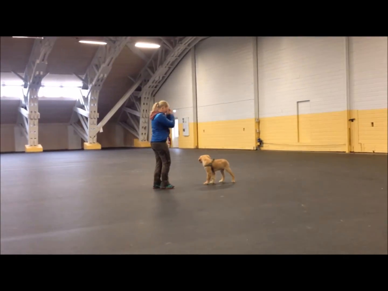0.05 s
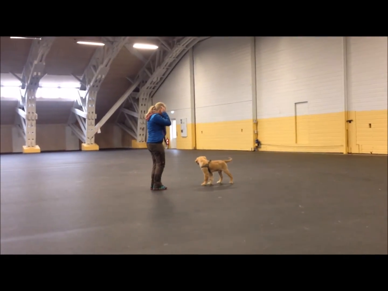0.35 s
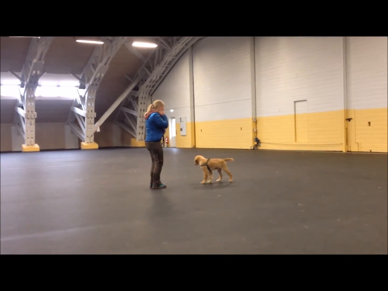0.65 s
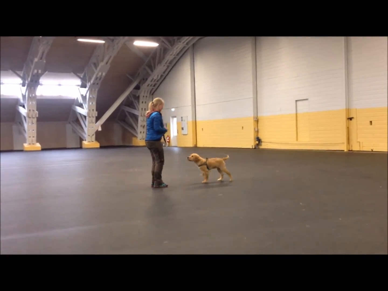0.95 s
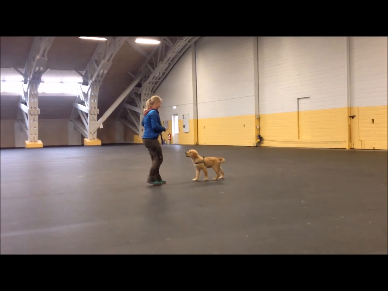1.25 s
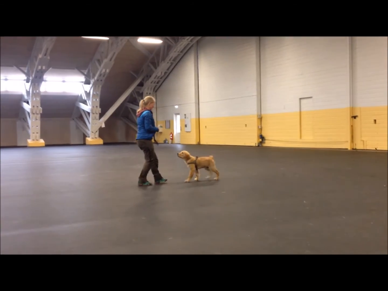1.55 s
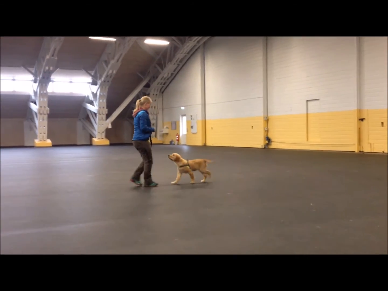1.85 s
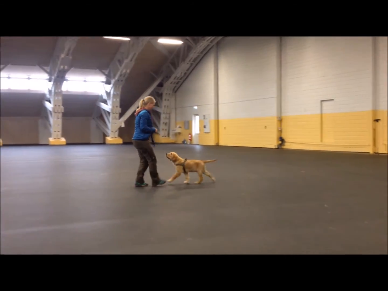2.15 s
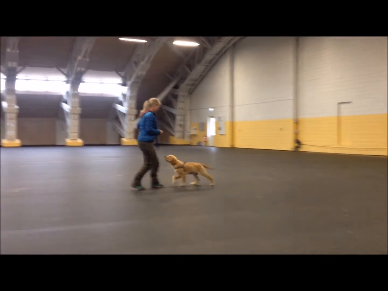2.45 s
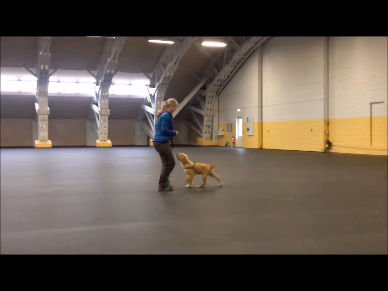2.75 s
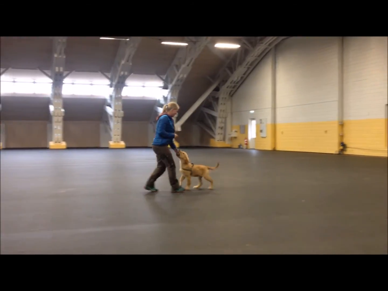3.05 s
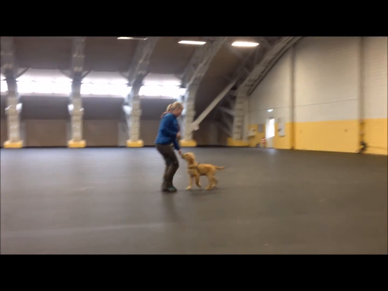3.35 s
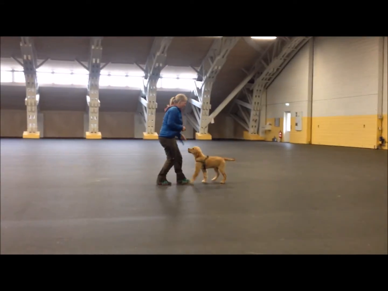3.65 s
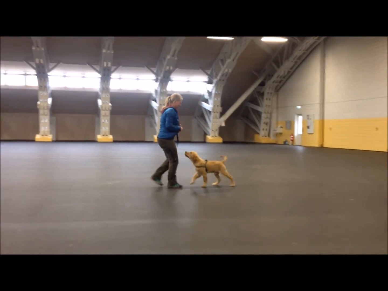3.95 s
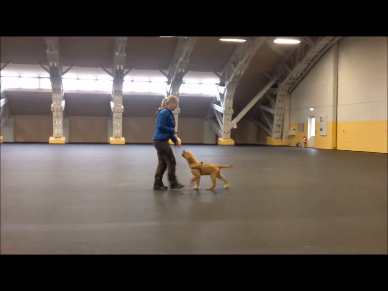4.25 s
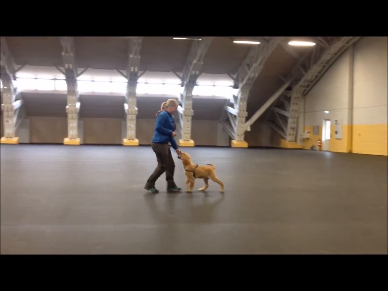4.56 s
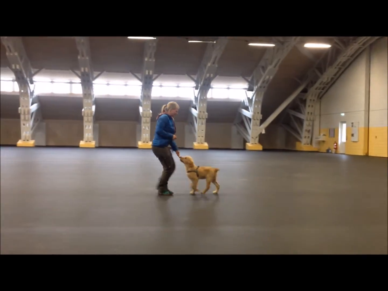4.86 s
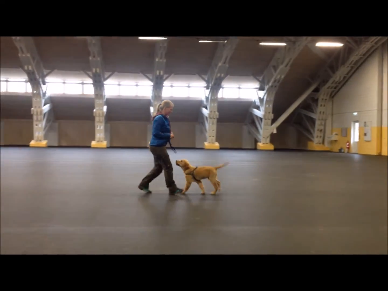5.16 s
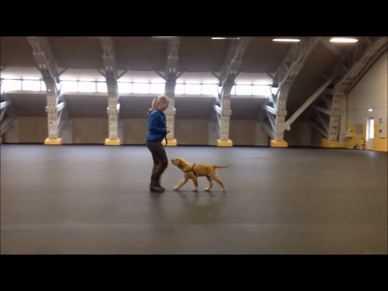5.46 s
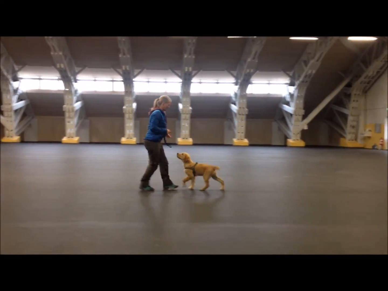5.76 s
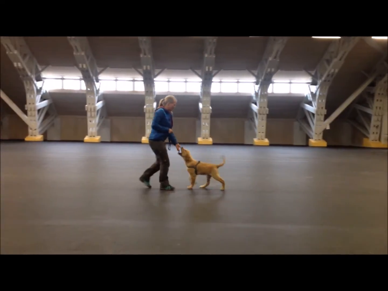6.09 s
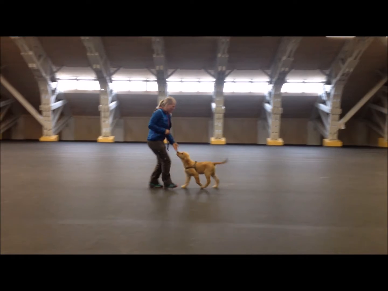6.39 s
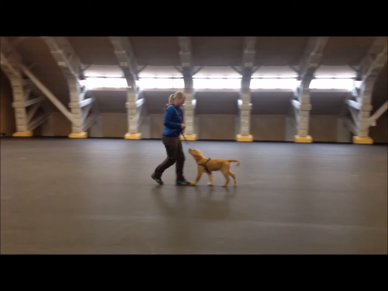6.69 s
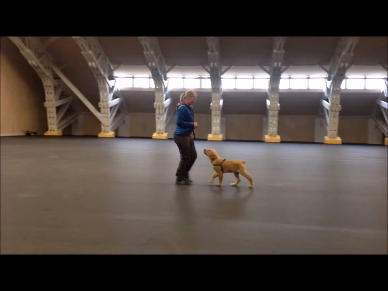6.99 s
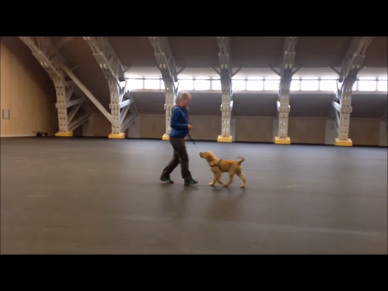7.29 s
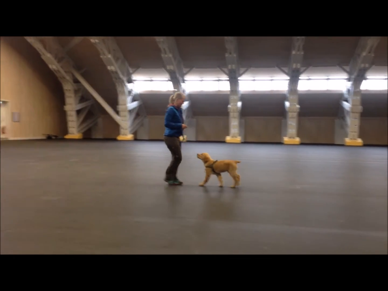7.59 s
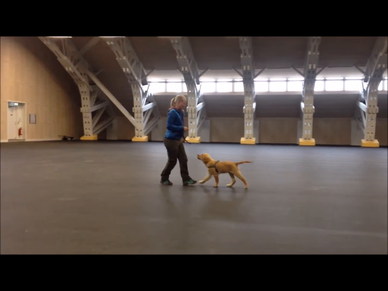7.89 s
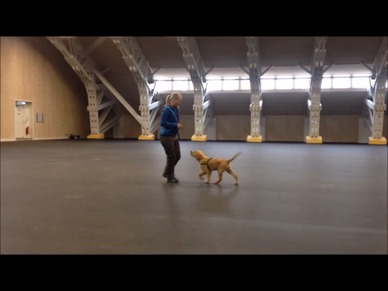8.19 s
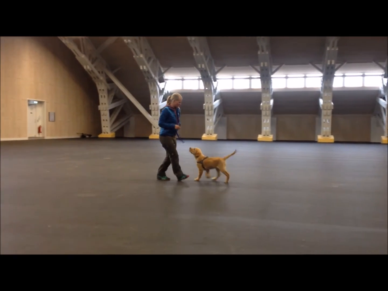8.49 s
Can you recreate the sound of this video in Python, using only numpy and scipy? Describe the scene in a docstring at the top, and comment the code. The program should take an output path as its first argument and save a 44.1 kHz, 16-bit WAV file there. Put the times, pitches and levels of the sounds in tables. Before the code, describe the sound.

A dog-training clicker snaps four times, echoing in a large empty hall, with soft knocks nearby and faint footsteps.

```python
"""A dog trainer's clicker sounds four times, some metres away, as the trainer walks through a big empty hall.
Its steel tongue buckles in (bright) and back out (hollow), and each snap excites briefly ringing modes.
Reflections from the roof and the end wall follow the direct sound, and the hall reverberates.
Soft knocks sound close by, a small hard thing ticks, and soles scuff the floor by friction.
Beneath them lie a dull, far rustle and the quiet hush of the air."""
import sys
import numpy as np
from scipy import signal
from scipy.fft import rfft, irfft, next_fast_len
from scipy.io import wavfile
from scipy.ndimage import uniform_filter1d

SR = 44100
rng = np.random.default_rng(int(sys.argv[2]) if len(sys.argv) > 2 else 0)


def wav_out(sig):
    """Save sig, one row per channel (or a flat mono array), as 16-bit PCM at SR to the path in sys.argv[1]."""
    wavfile.write(sys.argv[1], SR, np.round(np.clip(np.atleast_2d(sig).T, -1, 1) * 32767).astype(np.int16))


N = 376305

# clicks, each a pair of snaps: (press time [s], release time [s], press level [dB], release level [dB],
# resonance of the hollow hand [Hz], its lift [dB])
CLICK_EVENTS = [(1.2294, 1.352, -25, -25, 1870, -2), (3.9804, 4.1243, -24.5, -23, 2460, 5.5),
                (5.8246, 5.9712, -25.5, -23.5, 2180, 9.5), (7.3013, 7.4383, -21, -24.5, 1750, 6.5)]
# modes of the clicker: (frequency [Hz], t60 [s], level on press [dB], level on release [dB])
CLICKER_MODES = [(1395, 0.0044, -10, -9), (1682, 0.0059, -5.5, -1), (1784, 0.013, -19, -6),
                 (2513, 0.0069, -8.5, 1.5), (2735, 0.02, -15.5, -15), (3520, 0.013, -41, -1),
                 (4020, 0.012, -5.5, 0), (4535, 0.009, 3.5, -0.5), (5490, 0.0087, -48, -15.5),
                 (5570, 0.013, 3, -9), (6030, 0.0088, -4.5, -12), (6730, 0.0069, -10, -14.5),
                 (7620, 0.012, -14, -15), (8330, 0.0059, -6.5, -13.5), (10250, 0.012, -22.5, -21),
                 (11400, 0.0096, -15.5, -26), (13400, .006, -27, -44)]
# press spectrum over all directions, the modes blurred into humps: (frequency [Hz], level [dB])
PRESS_SPECTRUM = [(800, -39), (1150, -9.5), (1650, 3.5), (2500, -6), (2950, -6.5), (3800, 3.5),
                  (4550, 11.5), (5000, 4.5), (5550, 10.5), (6000, -4), (6900, -5), (8400, 1), (9400, -11.5),
                  (15000, -11)]
# release spectrum over all directions: (frequency [Hz], level [dB])
RELEASE_SPECTRUM = [(750, -27), (1150, -8.5), (1650, 2), (2350, 6.5), (3050, 0), (3450, 9), (3800, 10.5),
                    (4550, 9.5), (4950, -4), (5400, 0), (6700, -12), (8300, -10.5), (9200, -16.5),
                    (15000, -19)]
# echo paths as the trainer walks away from the end wall:
# (time [s], roof detour [m], roof echo level [dB], wall detour [m], wall echo level [dB])
ECHO_PATHS = [(1.35, 6.05, -39, 18.7, -32), (4.05, 9.6, -37.5, 21.4, -37.5),
              (5.85, 10.6, -36, 23.28, -34.5), (7.35, 10.75, -33.5, 24.22, -35)]
# reverberation time of the hall: (frequency [Hz], t60 [s])
HALL_DECAY = [(300, 1.35), (1500, 1.35), (2800, 0.83), (3500, 0.82), (4500, 0.81), (6000, 1.03),
              (8500, 0.64), (14000, 0.28)]
# narrow bands that linger in the hall: (frequency [Hz], width [Hz], t60 [s], gain [dB])
HALL_RESONANCES = [(3470, 113, 1.06, -4.5), (5650, 260, 0.47, -3.5)]
# soft knocks: (time [s], level [dB], bass mode gain [dB], relative rub level [dB], rattle length [s],
# rebound gap [s], relative rebound level [dB])
KNOCK_EVENTS = [(1.914, -51, -3, -20, 0, .027, -10), (2.574, -36.5, 2.5, -16, .095, .0272, -13),
                (2.701, -54, -16, -18, 0, .027, -10), (3.485, -42, 1.5, -11, .058, .023, -4.5)]
# modes of the knocked body: (nominal frequency [Hz], t60 [s], relative level [dB])
KNOCK_BODY_MODES = [(176, 0.013, 9), (370, 0.017, -1.5), (582, 0.027, 2), (620, 0.01, -6.5),
                    (1000, 0.039, -15), (1460, 0.019, -11.5)]
# a small hard thing touches down, then lands:
# (time [s], level [dB], contact t60 [s], tilt [dB/octave], hall gain [dB])
TICK_EVENTS = [(4.7392, -48.5, 0.0056, 6, -9), (4.7450, -43, 0.021, -0.5, -1.5)]
# resonances of that thing: (frequency [Hz], width [Hz], gain [dB])
TICK_RESONANCES = [(950, 1200, -8), (1720, 420, 3.5), (2730, 800, -7.5), (4270, 3100, -12.5),
                   (6100, 3400, -21)]
# scuffs of the soles: (time [s], length [s], level [dB], centre frequency [Hz])
SOLE_SCUFFS = [(0.234, 0.13, -67, 1560), (2.033, 0.059, -60.5, 1950), (2.512, 0.057, -61, 2200),
               (3.617, 0.053, -62, 2800), (4.614, 0.042, -60, 3200), (5.728, 0.033, -62.5, 2000),
               (6.831, 0.036, -65.5, 2500), (6.94, .038, -63, 1690), (6.984, 0.051, -60.5, 1000),
               (7.798, 0.12, -65, 5100), (8.445, 0.043, -66.5, 1950)]
# heavier footfalls: (time [s], level [dB])
HEAVY_STEPS = [(3.108, -61.5), (5.238, -66), (6.995, -60)]
# swells of the far rustle, and at 4.8 s the hall swelling on after the tick: (peak time [s], rise time constant
# [s], level [dB])
RUSTLE_SWELLS = [(3.6, 0.38, -66), (4.8, 0.7, -65), (5.8, 0.21, -66), (7.0, 0.76, -58.5),
                 (7.9, 0.28, -64.5)]
# spectrum of the rustle: (frequency [Hz], relative level [dB])
RUSTLE_SPECTRUM = [(100, -29), (260, -1), (500, -6), (1100, -6), (1800, -9), (3000, -19), (8000, -32)]
# spectrum of the hush: (frequency [Hz], relative level [dB])
AIR_SPECTRUM = [(15, -68), (25, -34), (50, -19), (129, -6), (173, -1.5), (215, -1), (388, -4.5),
                (494, -6.5), (1020, -7.5), (1410, -12), (2170, -14), (2760, -17.5), (7060, -22),
                (10600, -30.5), (15400, -20.5)]
# bands of faint hiss: (frequency [Hz], width [Hz], level [dB])
HISS_BANDS = [(4330, 650, -76), (6750, 760, -77.5)]

SOUND_M_S = 343
PRESS_HALL_DB, RELEASE_HALL_DB = -26.5, -24.5  # fed to the hall, however the hand is turned
THUMB_DB = -4.5  # while pressing, the thumb shades the path to the roof
# each echo comes once more, by way of a further surface
ROOF_AGAIN_S, ROOF_AGAIN_DB, WALL_AGAIN_S, WALL_AGAIN_DB = .0061, -4.5, .0125, -6
WALK_STARTS_S = 3.0  # light steps and the steady part of the rustle set in


def clicker(shaded_db=-7, hand_share=0.083, echo_top_hz=8000, wall_low_hz=2000):
    """Multipath propagation: each snap arrives directly, off roof and end wall, and as reverberation."""
    out = np.zeros(N)
    path_times, *paths = np.transpose(ECHO_PATHS)
    for press_s, release_s, press_db, release_db, hand_hz, hand_db in CLICK_EVENTS:
        snaps = [(False, press_s, press_db, THUMB_DB, PRESS_HALL_DB),
                 (True, release_s, release_db, 0, RELEASE_HALL_DB)]
        for released, s, db, thumb_db, hall_db in snaps:
            roof_m, roof_db, wall_m, wall_db = (np.interp(s, path_times, column) for column in paths)
            add(out, s, at_level(snap(released, hand_hz, hand_db), db))
            # the long way round dulls both echoes
            roof = cut(snap(released, hand_hz, hand_db / 2), echo_top_hz, "low", order=2)
            roof_s = s + roof_m / SOUND_M_S
            add(out, roof_s, at_level(roof, roof_db + thumb_db))
            add(out, roof_s + ROOF_AGAIN_S, at_level(roof, roof_db + thumb_db + ROOF_AGAIN_DB))
            # the hand opens away from the end wall, so that echo is thinner
            wall = cut(snap(released, hand_hz, shaded_db), echo_top_hz, "low", order=2)
            wall = cut(wall, wall_low_hz, "high", order=1)
            wall_s = s + wall_m / SOUND_M_S
            add(out, wall_s, at_level(wall, wall_db))
            add(out, wall_s + WALL_AGAIN_S, at_level(wall, wall_db + WALL_AGAIN_DB))
            pulse = radiated_pulse(released, hand_hz, hand_share * hand_db)
            add(out, s, hall(at_level(pulse, hall_db)))
    return out


def snap(released, hand_hz, hand_db, rise_s=0.0013, crack_db=-17, scatter_db=0.63, scatter_turns=0.14):
    """Snap-through buckling: the tongue cracks and excites modes that the fingers quickly damp."""
    t = clock(.04)
    hz, t60, press_db, release_db = np.transpose(CLICKER_MODES)[:, :, None]
    detune, uneven, lag = rng.standard_normal((3, len(hz), 1))
    db = (release_db if released else press_db) + hand_cavity(hz, hand_hz, hand_db) + scatter_db * uneven
    phase = 2 * np.pi * (hz * (1 + 0.0027 * detune) * t + scatter_turns * lag)
    modes = undb(db) / t60 * fade(t, t60) * np.sin(phase)
    ring = np.sum(modes, axis=0) * (1 - np.exp(-t / rise_s))
    crack = band(rng.standard_normal(len(t)), hz=4200, width=10000) * fade(t, t60=0.026)
    # so small a body radiates no bass
    return cut(at_level(ring, 0) + at_level(crack, crack_db), 1090, "high", order=6)


def hand_cavity(hz, hand_hz, hand_db, width_octaves=0.42, overtone_share=0.72, overtone_octaves=0.16):
    """Closed-pipe resonance: the gain in dB of the hollow hand, at one pitch and at three times it."""
    octaves_above = np.log2(hz / hand_hz)
    fundamental = np.exp(-(octaves_above / width_octaves) ** 2)
    overtone = np.exp(-((octaves_above - np.log2(3)) / overtone_octaves) ** 2)
    return hand_db * (fundamental + overtone_share * overtone)


def radiated_pulse(released, hand_hz, hand_db):
    """Radiated power: a short pulse with the spectrum of the snap summed over all directions."""
    spectrum = RELEASE_SPECTRUM if released else PRESS_SPECTRUM
    with_hand = [(hz, db + hand_cavity(hz, hand_hz, hand_db)) for hz, db in spectrum]
    return colour(signal.unit_impulse(256, "mid"), with_hand)


def hall(x, gap_s=0.019, floor_db=-12, roof_s=0.028, roof_width_s=0.004, roof_db=3.5, girder_db=-19):
    """Reverberation: a swell of roof reflections and single girder echoes lead into a diffuse tail."""
    t = clock(1.5)
    # echoes arrive in clumps, not as an even stream
    clumps_db = wander(300, size=len(t)) + wander(69.4, size=len(t))
    spectrum = rfft(unit(rng.standard_normal(len(t)) * undb(clumps_db)))
    bin_hz = np.arange(len(spectrum)) * SR / len(t)
    centres_hz = 250 * 2 ** (np.arange(13) / 2)
    tail = np.zeros(len(t))
    # half-octave bands decay separately: the air absorbs the treble first
    for hz, share in zip(centres_hz, np.eye(len(centres_hz))):
        weight = along(np.c_[centres_hz, share], bin_hz)
        tail += irfft(spectrum * weight, len(t)) * fade(t, along(HALL_DECAY, hz))
    for hz, width, t60, db in HALL_RESONANCES:
        tail += undb(db) * steep_band(rng.standard_normal(len(t)), hz, width) * fade(t, t60)
    # little comes back until the sound reaches the roof
    tail *= np.interp(t, [gap_s * 0.99, gap_s * 1.1], [undb(floor_db), 1])
    tail *= undb(roof_db * np.exp(-((t - roof_s) / roof_width_s) ** 2))
    response = tail * np.sqrt(2 * np.log(1000) / SR)  # unit energy for a t60 of 1 s
    girder_s = rng.uniform(roof_s, 0.083, size=12)
    girder_echoes = unit(rng.standard_normal(len(girder_s))) / np.sqrt(len(girder_s))
    response[(girder_s * SR).astype(int)] += undb(girder_db) * girder_echoes
    return signal.fftconvolve(x, response)


def knocks(thud_step_db=-7, pitch_sag=0.017, stray_s=0.00105):
    """Rebound: some knocks rattle on, more softly and losing bass; all are too close to stir the hall."""
    out = np.zeros(N)
    for s, db, thud_db, rub_db, rattle_s, gap_s, rebound_db in KNOCK_EVENTS:
        add(out, s, knock(db, thud_db, rub_db, pitch=0.92))
        for k, lag_s in enumerate(np.arange(gap_s, rattle_s, gap_s)):
            rebound = knock(db + rebound_db, thud_db + k * thud_step_db, rub_db, pitch=1 - k * pitch_sag)
            add(out, s + lag_s + stray_s * rng.standard_normal(), rebound)
    return out


def knock(db, thud_db, rub_db, pitch, rise_s=0.0022, thud_below_hz=450):
    """Damped free vibration: one soft blow sets the modes of a small body ringing."""
    t = clock(.08)
    hz, t60, mode_db = np.transpose(KNOCK_BODY_MODES)[:, :, None]
    gain = undb(mode_db + thud_db * (hz < thud_below_hz))
    modes = gain * fade(t, t60) * np.cos(2 * np.pi * hz * pitch * t)
    ring = np.sum(modes, axis=0) * (1 - np.exp(-t / rise_s))
    ring = cut(ring, 130, "high", order=2)
    # the two surfaces rub for a moment as they meet
    rub = band(rng.standard_normal(len(t)), hz=3400, width=2800) * fade(t, t60=0.035)
    rub = cut(rub, 7000, "low", order=3)
    return at_level(ring, db) + at_level(rub, db + rub_db)


def ticks():
    """Impact excitation: a small hard thing ticks in the hall; the shorter contact is the brighter."""
    out, t = np.zeros(N), clock(.05)
    for s, db, t60, tilt_db, hall_db in TICK_EVENTS:
        contact = rng.standard_normal(len(t)) * fade(t, t60)
        body = sum(undb(mode_db + tilt_db * np.log2(hz)) * steep_band(contact, hz, width)
                   for hz, width, mode_db in TICK_RESONANCES)
        tick = at_level(cut(body, 10000, "low", order=2), db)
        add(out, s, tick)
        add(out, s, undb(hall_db) * hall(tick))
    return out


def footsteps(steps_per_s=3, step_db=-71.5, uneven_db=2.5, stray_s=0.046, hall_db=-2):
    """Contact noise: scuffs, dull footfalls and light uneven steps on the floor excite the hall."""
    out = np.zeros(N)
    for s, length_s, db, hz in SOLE_SCUFFS:
        add(out, s, sole_stroke(length_s, db, hz))
    for s, db in HEAVY_STEPS:
        add(out, s, sole_stroke(length_s=0.031, db=db, hz=300))
    for s in np.arange(WALK_STARTS_S, N / SR - .5, 1 / steps_per_s):
        late, strength = rng.standard_normal(2)
        light_step = sole_stroke(length_s=.04, db=step_db + uneven_db * strength, hz=1900)
        add(out, s + stray_s * late, light_step)
    out = cut(out, 7700, "low", order=4)
    return out + undb(hall_db) * hall(out)[:N]


def sole_stroke(length_s, db, hz, grain_db=4, grain_samples=50):
    """Sliding friction: a sole brushes the floor in one short burst of gritty noise."""
    t = clock(length_s)
    noise = rng.standard_normal(SR)
    grains = np.repeat(rng.standard_normal(SR // grain_samples), grain_samples)
    grit = (noise * undb(grain_db * grains))[:len(t)]
    envelope = np.sin(np.pi * (t / length_s) ** 0.71)
    return undb(db) * unit(band(grit, hz, width=0.97 * hz) * envelope)


def rustle(bed_db=-73.5, swell_t60=1.6, flutter_db=1.6):
    """Incoherent addition: the steady bed and slow swells of a dull, far rustle sum in power."""
    t = np.arange(N) / SR
    power = undb(bed_db) ** 2 * np.clip(t - WALK_STARTS_S, 0, 1)
    for peak_s, rise_s, db in RUSTLE_SWELLS:
        rise = np.exp(np.minimum(t - peak_s, 0) / rise_s)
        decay = fade(np.maximum(t - peak_s, 0), swell_t60)
        power += (undb(db) * rise * decay) ** 2
    flutter = undb(flutter_db * wander(rate_hz=40))
    return np.sqrt(power) * flutter * unit(colour(rng.standard_normal(N), RUSTLE_SPECTRUM))


def air(hush_db=-63.5, flicker_db=1.3):
    """Ambient noise: the broadband hush of the hall flickers in the bass under a faint steady hiss."""
    hush = undb(hush_db) * unit(colour(rng.standard_normal(N), AIR_SPECTRUM))
    bass = cut(hush, 620, "low", order=1)
    flicker = undb(flicker_db * wander(rate_hz=22))
    hiss = sum(undb(db) * unit(band(rng.standard_normal(N), hz, width)) for hz, width, db in HISS_BANDS)
    return hush + (flicker - 1) * bass + hiss


def undb(db):
    """The decibel scale: amplitude ratio for a level."""
    return 10 ** (np.asarray(db) / 20)


def unit(x):
    """Normalisation to an rms of 1."""
    return x / np.sqrt(np.mean(x ** 2))


def at_level(x, db):
    """Equivalent level: scale a short sound so that its energy, packed into 4 ms, has this level."""
    return x * undb(db) * np.sqrt(.004 * SR / np.sum(x ** 2))


def clock(length_s):
    """Uniform sampling: the sample times over a duration."""
    return np.arange(int(length_s * SR)) / SR


def fade(t, t60):
    """Exponential decay, by 60 dB in t60 seconds."""
    return np.exp(-np.log(1000) * t / t60)


def wander(rate_hz, size=N):
    """Random fluctuation: values drawn at the given rate, smoothed and scaled to an rms of 1."""
    hold = int(SR / rate_hz)
    steps = np.repeat(rng.standard_normal(size // hold + 1), hold)
    return unit(uniform_filter1d(uniform_filter1d(steps, hold), hold)[:size])


def along(points, hz):
    """Interpolation of (frequency [Hz], value) points on a logarithmic frequency axis."""
    point_hz, value = np.transpose(points)
    return np.interp(np.log(np.maximum(hz, 1)), np.log(point_hz), value)


def colour(x, points):
    """Spectral shaping by (frequency [Hz], gain [dB]) points."""
    size = next_fast_len(len(x))
    bin_hz = np.arange(size // 2 + 1) * SR / size
    return irfft(rfft(x, size) * undb(along(points, bin_hz)), size)[:len(x)]


def band(x, hz, width):
    """Resonance: a second-order band-pass with its width in Hz."""
    return signal.lfilter(*signal.iirpeak(hz, hz / width, fs=SR), x)


def steep_band(x, hz, width):
    """Cascaded resonance: two equal stages give a narrower band with steeper skirts."""
    return band(band(x, hz, width), hz, width)


def cut(x, hz, kind, order):
    """Maximally flat filtering, high-pass or low-pass."""
    return signal.sosfilt(signal.butter(order, hz, kind, fs=SR, output="sos"), x)


def add(out, s, x):
    """Superposition: mix a sound in at s seconds."""
    start = int(s * SR)
    out[start:start + len(x)] += x[:len(out) - start]


def scene():
    """Superposition: the pressures of all sources sum at one listening point."""
    return (clicker() + knocks() + ticks() + footsteps() + rustle() + air())[None]


def record(dry, bottom_hz=50, top_hz=15450):
    """Band limiting: the deep bass is dropped and the highest treble is cut steeply."""
    thin = cut(dry, bottom_hz, "high", order=4)
    return signal.sosfilt(signal.ellip(10, .2, 70, top_hz, fs=SR, output="sos"), thin)


dry = scene()
out = record(dry)
wav_out(out)
```